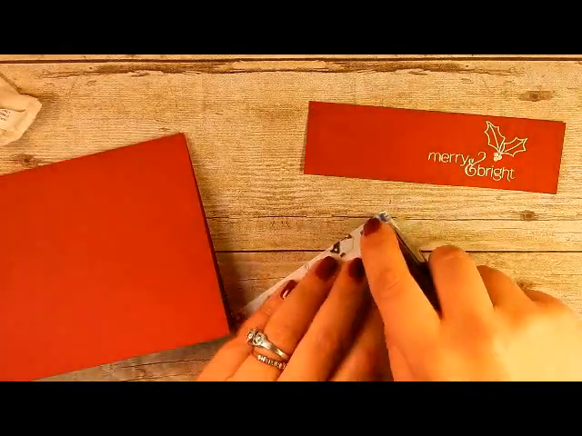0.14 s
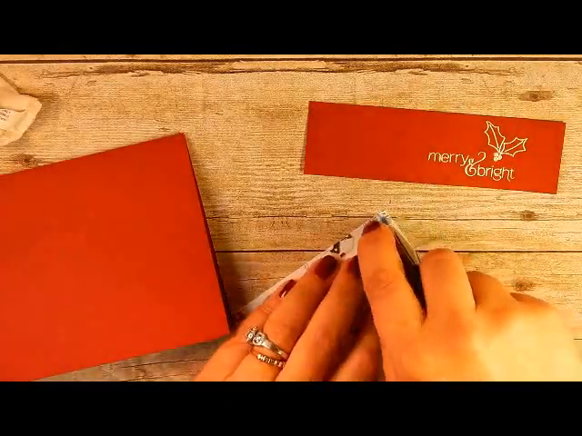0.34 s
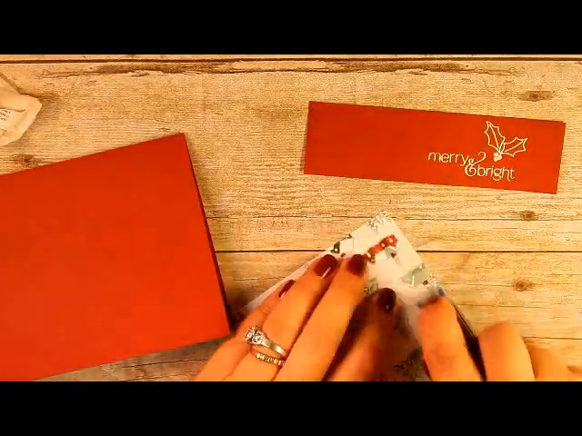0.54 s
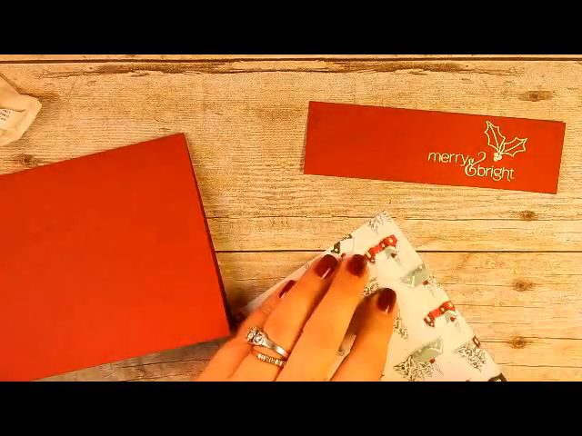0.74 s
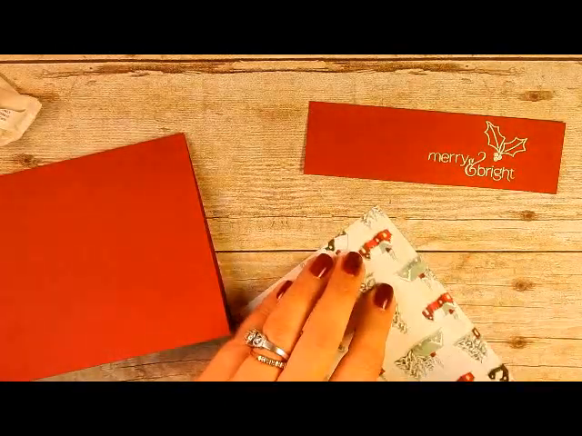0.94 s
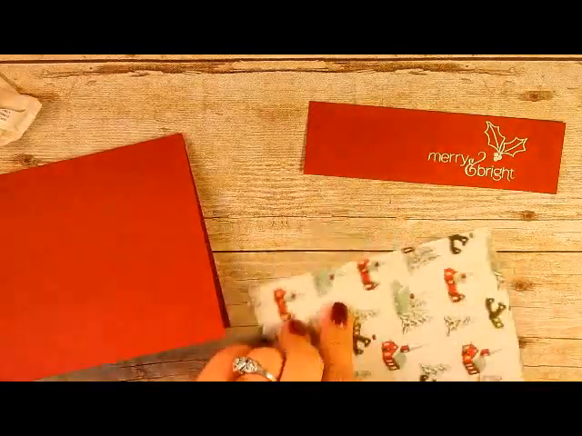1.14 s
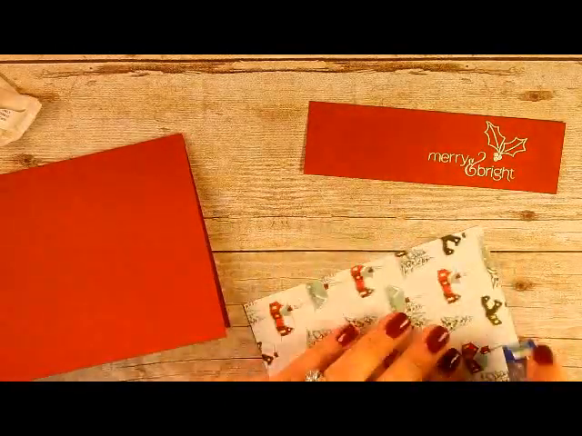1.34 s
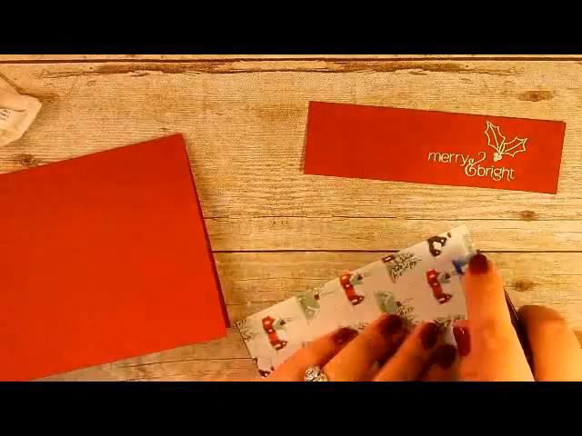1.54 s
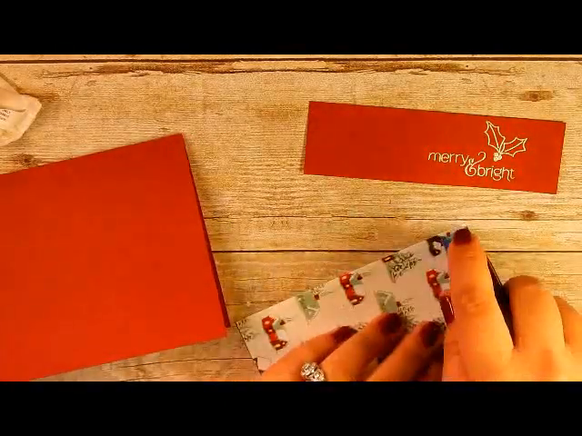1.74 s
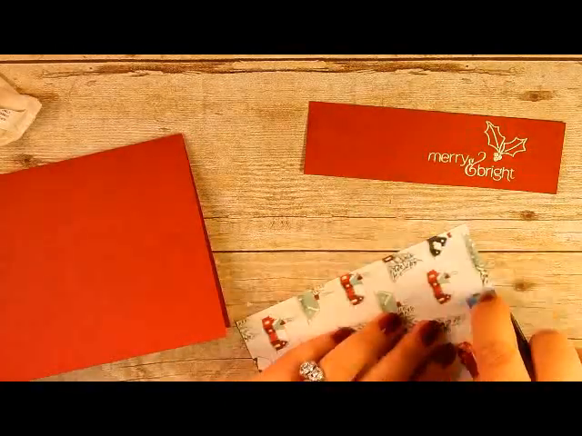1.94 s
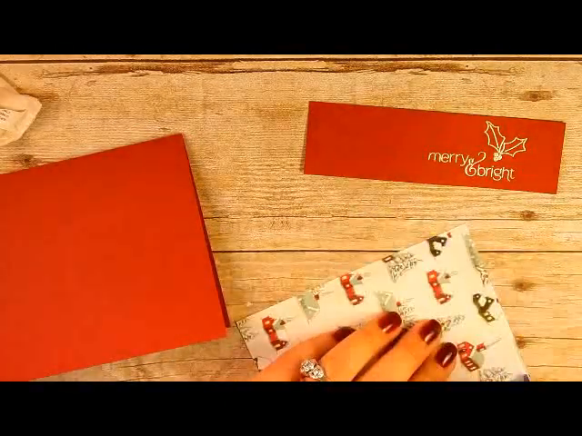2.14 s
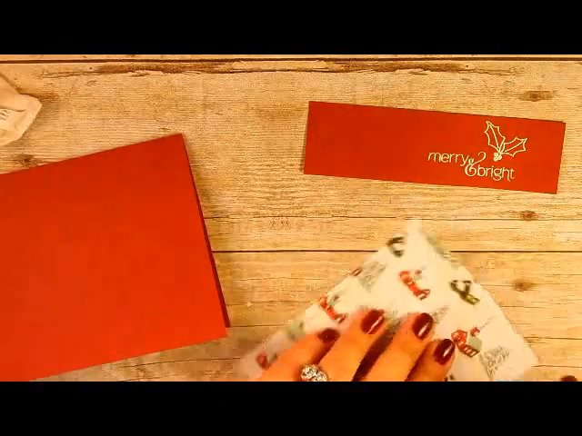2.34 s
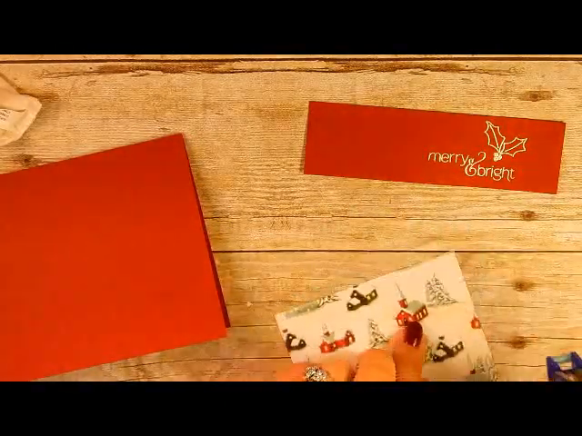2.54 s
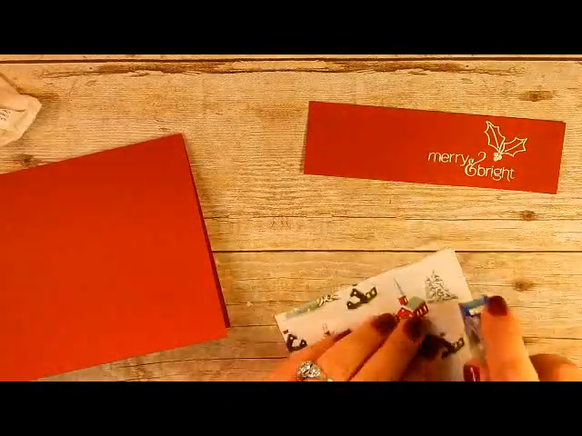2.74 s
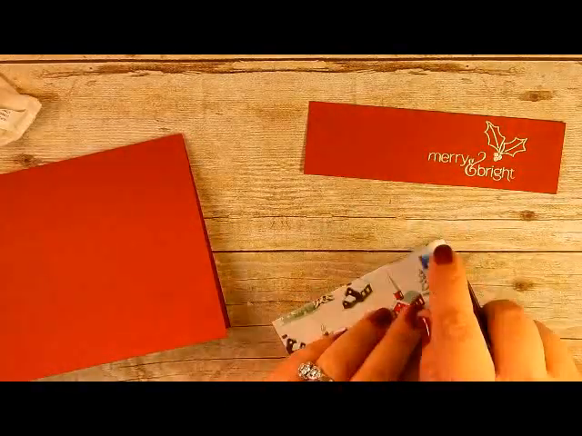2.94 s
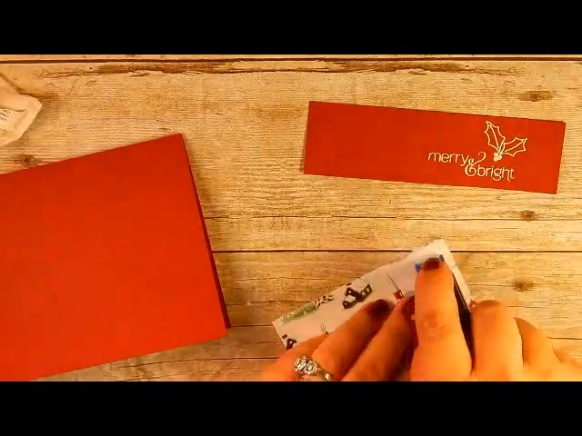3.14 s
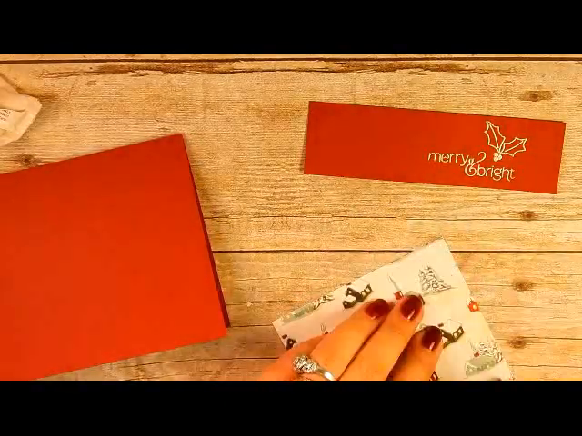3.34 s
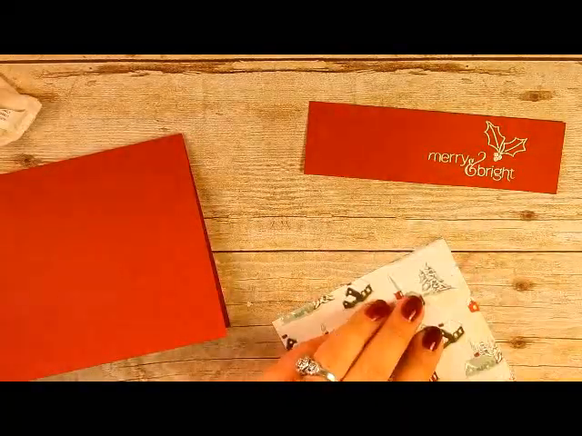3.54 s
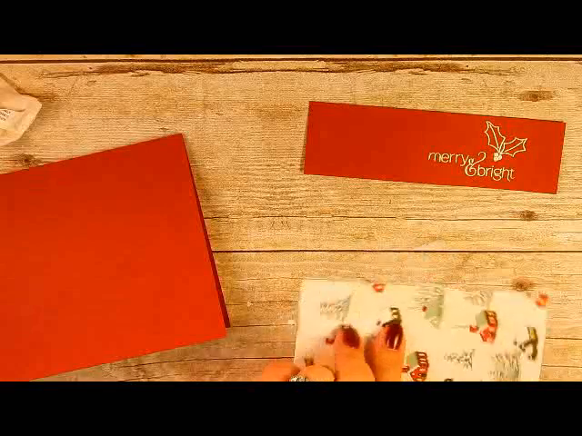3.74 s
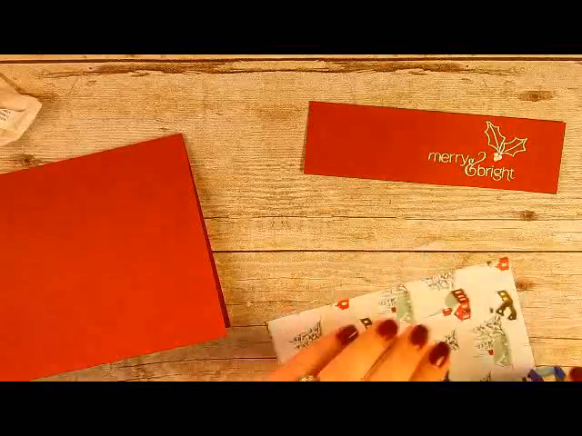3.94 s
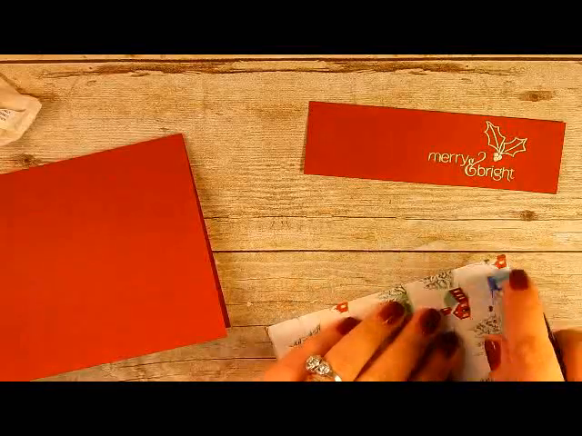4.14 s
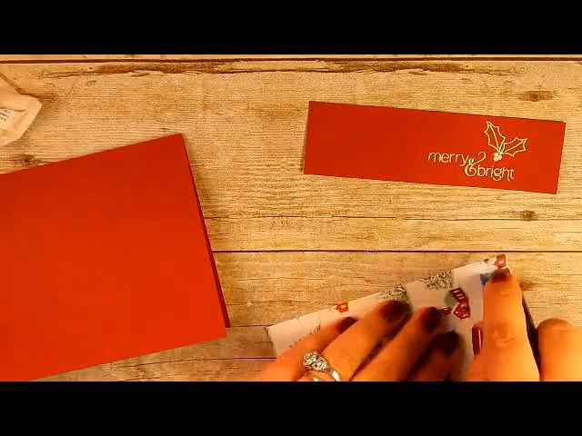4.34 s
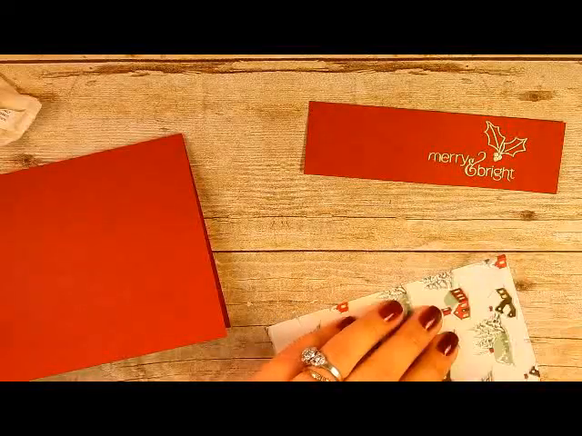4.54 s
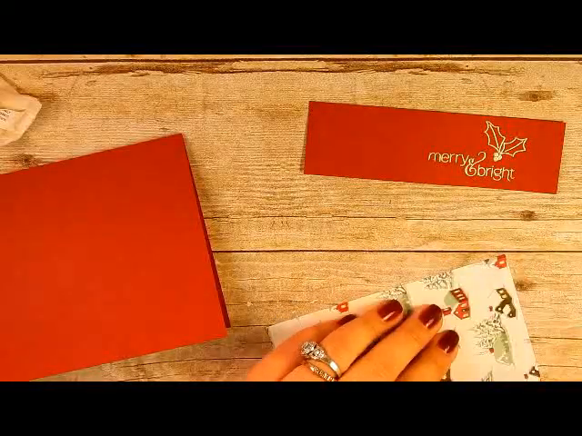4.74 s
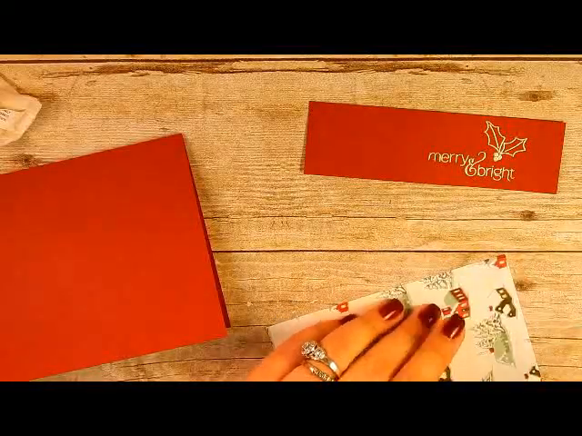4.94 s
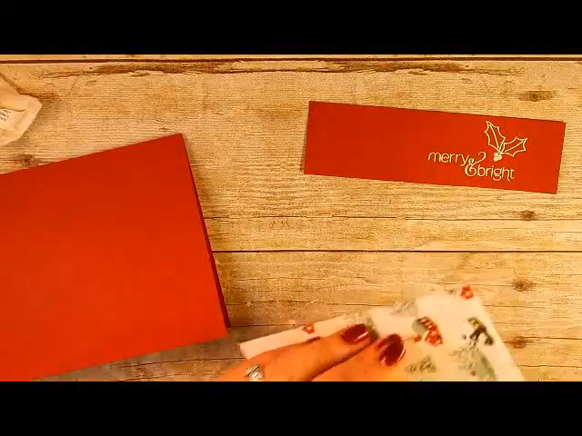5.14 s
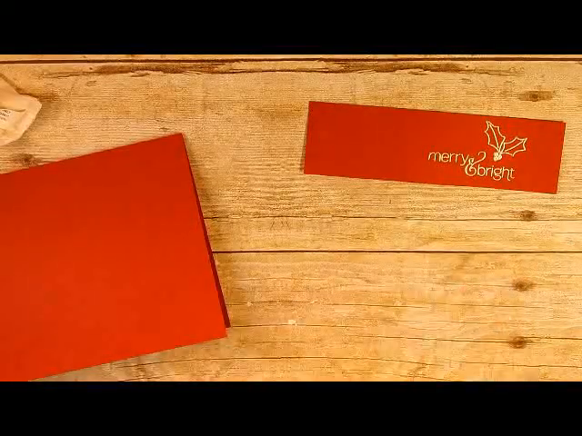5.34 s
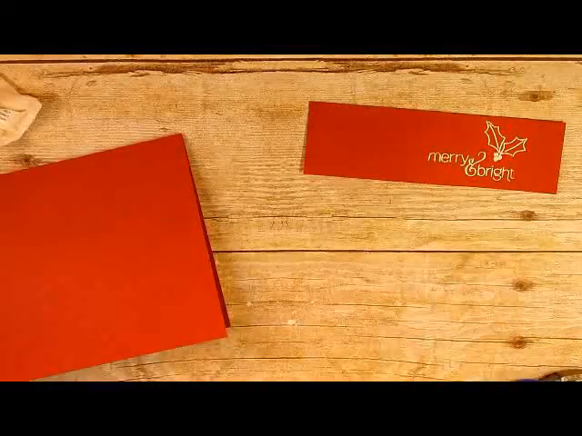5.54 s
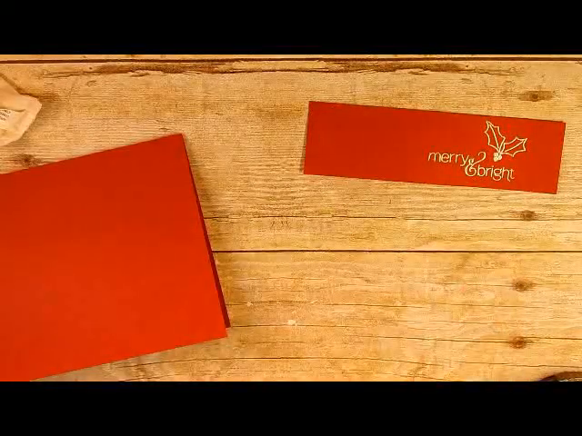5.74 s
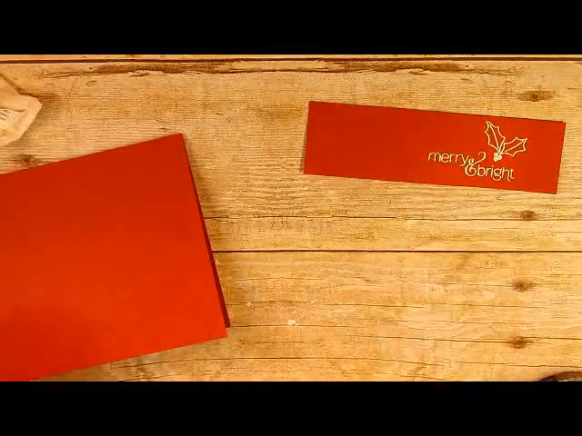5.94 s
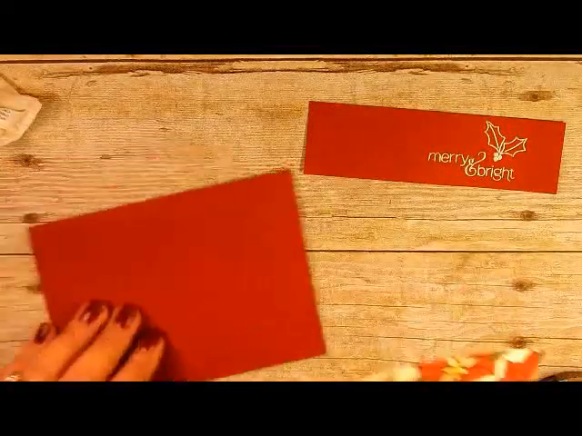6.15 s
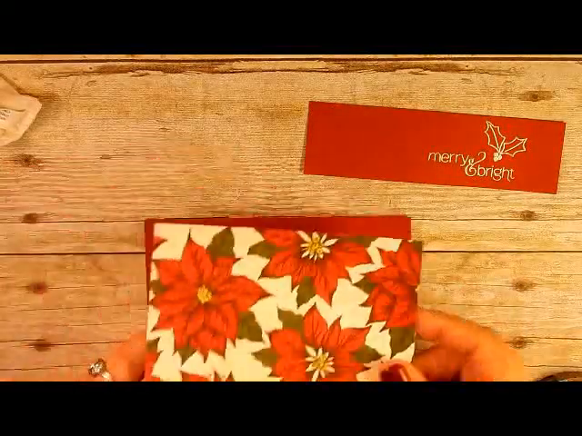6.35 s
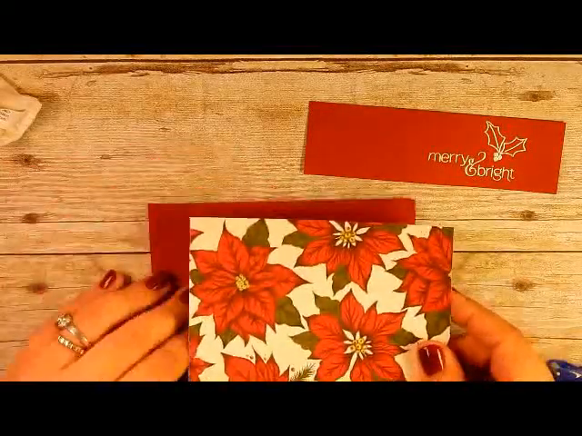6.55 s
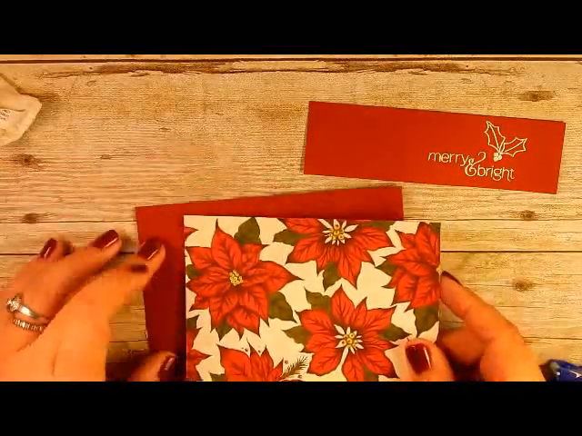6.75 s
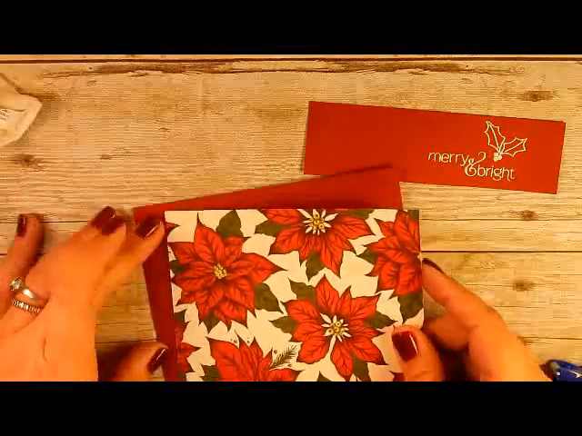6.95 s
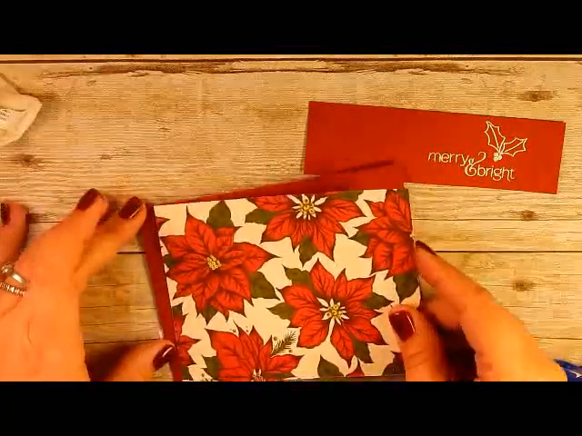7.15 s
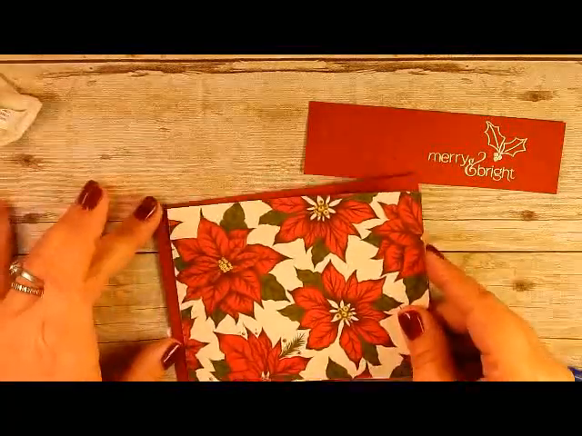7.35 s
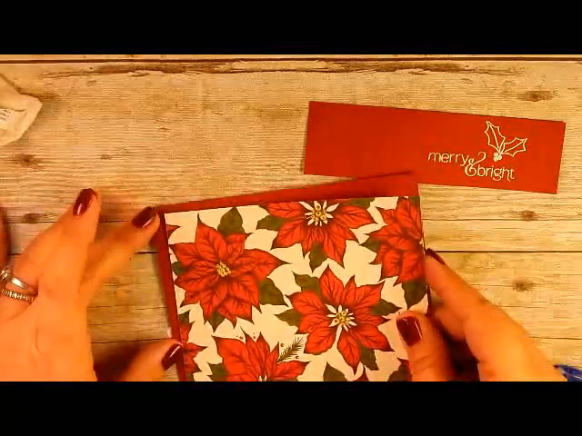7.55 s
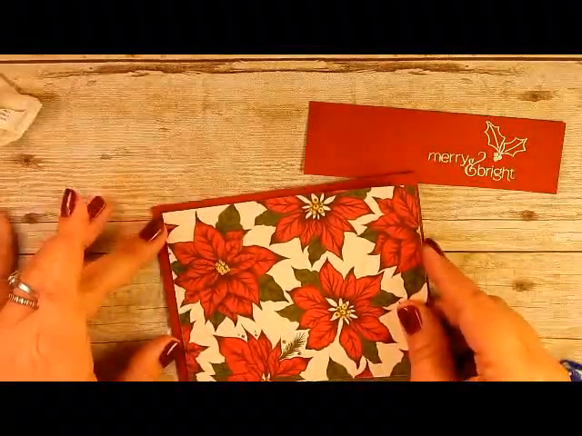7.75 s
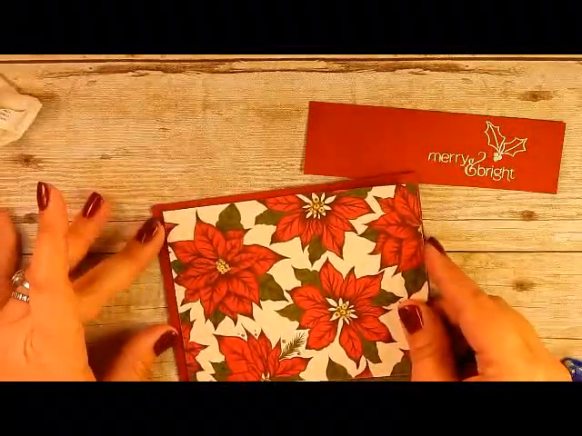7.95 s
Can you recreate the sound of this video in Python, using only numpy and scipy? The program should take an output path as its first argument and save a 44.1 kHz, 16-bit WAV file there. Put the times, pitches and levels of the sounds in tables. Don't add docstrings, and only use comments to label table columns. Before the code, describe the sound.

Close-up desk crafting heard by a near stereo phone microphone. Four rapid stick-slip rasps from a small plastic adhesive roller, each under half a second, bright and gritty with a shifting squeaky ring. Between them paper is turned with faint hiss, scrapes and clicks. Afterwards come hard plastic clacks, the loudest moment, a card thump and smooth swish, then quiet paper scuffs and small ticks over low room rumble.

```python
import sys
import numpy as np
from scipy import signal
from scipy.fft import rfft, irfft, next_fast_len
from scipy.io import wavfile
from scipy.ndimage import uniform_filter1d, minimum_filter1d, map_coordinates

SR = 44100
rng = np.random.default_rng(int(sys.argv[2]) if len(sys.argv) > 2 else 0)


def amplitude_ratio(level_db):
    exponent = np.asarray(level_db, float) / 20
    return 10 ** exponent


def pcm_store(signal):
    levels = np.round(np.clip(np.atleast_2d(signal), -1, 1) * 32767)
    wavfile.write(sys.argv[1], SR, levels.astype(np.int16).T)


N = 352800


def unit(x):
    return x / np.sqrt(np.mean(x ** 2) + 1e-20)


def along(points, hz):
    f, v = np.transpose(points)
    return np.interp(np.log(hz + 1), np.log(f + 1), v)


def wobble(rate):
    knots = rng.standard_normal(int(N * rate / SR) + 4)
    return map_coordinates(knots, [np.arange(N) * rate / SR])


def filtered(x, response):
    m = next_fast_len(x.shape[-1] + 8192)
    return irfft(rfft(x, m) * response(np.fft.rfftfreq(m, 1 / SR)), m)[..., :x.shape[-1]]


def modes(table):
    def response(f):
        total = 0
        for k, (centre, width, db) in enumerate(table):
            damping = 1j * f * width
            total = total + (-1) ** k * amplitude_ratio(db) * damping / (centre * centre - f * f + damping)
        return total
    return response


def even(response):
    gain = np.sqrt(np.mean(np.abs(response(np.arange(1, SR // 2, 5.))) ** 2))
    return lambda hz: response(hz) / gain


def patchy(x, patchy_db):
    z = signal.stft(x, nperseg=128)[2]
    field = uniform_filter1d(rng.standard_normal(z.shape), size=2, axis=0)
    field = uniform_filter1d(field, size=24, axis=1)
    return signal.istft(z * amplitude_ratio(patchy_db * unit(field)), nperseg=128)[1][:N]


# frequency in Hz, level in dB per Hz.
AIR_SPECTRUM = [(15, -28), (32, -8.5), (58, 5.5), (80, -2), (115, -1.5), (200, -4), (450, -11.5),
                (900, -12.5), (1400, -14.5), (2400, -18.5), (4000, -23.5), (5600, -27.5), (6300, -35),
                (10400, -41.5), (12000, -70)]
# frequency in Hz, left-right likeness from 0 to 1.
AIR_LIKENESS = [(60, 0.12), (220, 0.045), (800, 0.58), (2900, 0.79), (10600, 0.26)]


def air():
    turn = lambda hz: np.arccos(np.clip(along(AIR_LIKENESS, hz), -1, 1)) / 2
    pair = np.array([patchy(row, patchy_db=2.5) for row in rng.standard_normal((2, N))])
    mid, side = filtered(pair, lambda hz: amplitude_ratio(along(AIR_SPECTRUM, hz)) * [np.cos(turn(hz)), np.sin(turn(hz))])
    return amplitude_ratio(-55) * unit(np.array([mid + side, mid - side]))


# frequency in Hz, level in dB per Hz.
CRACK_SPECTRUM = [(200, -30), (500, -16.5), (950, -3), (1500, -3), (2200, -4.5), (3200, -5), (4700, -8.5),
                  (7000, -19.5), (10500, -36), (13000, -54)]
# time in seconds, peak in dB, ring in Hz, t60 in seconds.
PATS = [(.2282, -41.5, 1610, 0.041), (1.1286, -39, 1380, 0.062), (1.9075, -30.5, 1510, 0.02),
        (1.919, -41.5, 1500, .09), (1.114, -36.5, 1430, .03), (7.768, -52, 1500, 0.068),
        (5.672, -18, 1590, 0.045), (5.565, -16.5, 2200, 0.041), (5.556, -12, 1770, 0.017),
        (2.0171, -41, 1560, .062), (2.4683, -29.5, 3850, 0.026), (3.7764, -41.5, 1570, 0.022),
        (3.848, -31.5, 3080, 0.015), (4.4091, -31.5, 2514, 0.056), (4.424, -36, 1650, 0.094),
        (4.8698, -38.5, 1540, 0.19), (5.2, -28, 1680, 0.055), (5.3128, -35, 1800, 0.074),
        (5.3962, -38.5, 2900, 0.031), (5.5099, -19, 1400, 0.11), (5.7119, -21.5, 4000, 0.05),
        (5.7915, -30, 2500, 0.015), (5.9114, -39.5, 880, 0.028), (5.9259, -36.5, 1160, 0.029),
        (6.0624, -12.5, 880, 0.014), (6.058, -18, 2070, 0.015), (6.078, -17, 1150, 0.048),
        (6.0859, -16, 1840, 0.069), (6.087, -42, 3550, 0.029), (6.094, -26.5, 1850, 0.059),
        (6.4295, -27, 620, 0.025), (6.4305, -25, 950, .02), (6.053, -18, 760, .05), (6.165, -34, 700, .1),
        (.236, -42, 1650, .06), (5.73, -30, 1400, .05), (6.54, -39, 1300, 0.045),
        (.2175, -44.5, 1150, 0.062), (6.8839, -37.5, 2000, 0.026), (6.9624, -34.5, 1740, 0.063),
        (7.1028, -41, 2070, 0.087), (7.9904, -44, 1830, 0.047), (7.9954, -30, 1780, 0.068)]
# time in seconds, peak in dB, ring in Hz, t60 in seconds.
CLICKS = [(.3415, -36, 1610, 0.018), (.5491, -39.5, 1190, 0.071), (1.8745, -35, 1530, 0.18),
          (1.8845, -32.5, 2830, 0.081), (2.0262, -33.5, 1490, 0.26), (2.4996, -27.5, 6400, 0.024),
          (2.9524, -44, 1370, 0.22), (3.2103, -26, 1960, 0.094), (3.2294, -30.5, 1440, 0.063),
          (3.3223, -33, 1520, 0.18), (3.7229, -26, 2300, 0.032), (3.7456, -33, 1300, 0.097),
          (3.9128, -35.5, 5740, 0.036), (4.4958, -35.5, 1600, 0.038), (4.8854, -32, 1410, 0.11),
          (5.033, -41.5, 1940, 0.069), (5.0715, -31, 2720, 0.054), (5.079, -31, 2060, 0.028),
          (5.1447, -36, 2920, 0.093), (5.1902, -25.5, 2130, 0.033)]
# time in seconds, peak in dB, ring in Hz, t60 in seconds.
TICKS = [(1.0965, -30.5, 3850, 0.062), (1.5684, -33, 1930, 0.043), (2.4394, -28.5, 2780, 0.078),
         (2.4893, -20.5, 6330, 0.0095), (4.2161, -40, 2360, 0.047), (.407, -66, 3250, .015),
         (.492, -68, 3200, 0.013), (.593, -45, 3900, .015), (4.8981, -23, 1390, 0.022),
         (4.9298, -34, 3190, 0.059), (4.9358, -34, 5800, 0.035), (4.9742, -24, 6360, 0.004),
         (4.976, -41, 3500, 0.026), (4.889, -32.5, 5500, .008), (5.4922, -28.5, 1630, 0.096),
         (6.4303, -16.5, 2840, 0.014), (7.781, -38, 5530, .03), (7.7846, -19.5, 5870, 0.0021),
         (7.7862, -21.5, 5350, 0.0032), (7.7876, -22, 4520, 0.0048), (7.792, -58, 5530, 0.078),
         (7.747, -56, 7000, .03)]
# time in seconds, peak in dB, ring in Hz, t60 in seconds.
KNOCKS = [(5.5024, -15.5, 3400, 0.045), (5.507, -12.5, 3280, 0.028), (5.5518, -5, 1810, .012),
          (5.5545, -4.5, 3270, 0.0092), (5.5863, -13, 3150, 0.11), (5.5926, -14, 1440, 0.072),
          (5.6625, -14.5, 3780, 0.023), (5.6655, -5, 1820, 0.022), (5.78, -34, 2650, 0.022),
          (5.901, -36.5, 1900, 0.033), (6.0154, -39.5, 1900, 0.13), (6.0421, -25.5, 1020, 0.11),
          (6.0526, -10, 2850, 0.018), (6.0535, -13.5, 4660, 0.012), (6.2322, -21.5, 2580, 0.023),
          (6.238, -24, 1480, 0.059), (6.5725, -20, 1410, 0.05), (6.5835, -20.5, 3120, 0.028),
          (6.598, -25.5, 1410, 0.13), (6.5905, -17, 1440, 0.034), (6.632, -29, 4300, 0.11),
          (6.036, -32, 4200, 0.15), (6.6247, -19, 1580, 0.064), (6.645, -25.5, 1370, 0.12),
          (6.9239, -35, 1810, 0.041), (7.3325, -32, 2890, 0.0097), (7.5001, -40.5, 1700, 0.11),
          (7.9557, -45, 1560, 0.079)]


def taps():
    out, t = np.zeros(N + SR), np.arange(SR // 6) / SR
    chatter = amplitude_ratio(2.7 * wobble(520))
    kinds = [(TICKS, 28), (CLICKS, 4), (KNOCKS, -1), (PATS, -32.5)]
    for rows, treble_db in kinds:
        for s, db, ring_hz, t60 in rows:
            t60, start = np.clip(t60, .003, .3), round(s * SR)
            onset = (1 - np.exp(-t / (.016 * t60))) ** 2
            rattle = (1.1 * amplitude_ratio(-60 * t / min(.012, t60)) + amplitude_ratio(-60 * t / t60)) * onset
            burst = rattle * np.resize(chatter[start:], len(t)) * rng.standard_normal(len(t))
            tilt = lambda hz: amplitude_ratio(treble_db * np.clip(np.log2((hz + 1) / 2500) / 2, 0, 1.2))
            ring = modes([(ring_hz, .16 * ring_hz, 5)])
            sound = filtered(burst, lambda hz: amplitude_ratio(along(CRACK_SPECTRUM, hz)) * tilt(hz) + ring(hz))
            out[start:][:len(t)] += amplitude_ratio(db) * sound / np.abs(sound).max()
    return out[:N]


# frequency in Hz, width in Hz, level in dB.
DESK_MODES = [(60.7, 16, -5), (110.8, 20.3, 2), (203.4, 66, -0.5), (359, 160, -5), (687, 90, 0)]
# time in seconds, push in dB.
THUDS = [(.2282, -56), (1.5702, -34.5), (1.599, -37.5), (1.8735, -40.5), (1.884, -49.5), (2.0283, -50.5),
         (2.442, -49), (2.9533, -45), (3.21, -29), (3.2282, -40), (3.3234, -56), (3.747, -53),
         (4.215, -45.5), (4.4085, -40), (5.493, -42), (5.5024, -34), (5.5095, -30), (5.552, -26.5),
         (5.5866, -31.5), (5.592, -56), (5.665, -44), (5.71, -43.5), (6.0142, -51), (6.044, -43.5),
         (6.0624, -58), (6.23, -42), (6.5747, -36.5), (6.6495, -48), (7.1008, -45.5), (7.9954, -27.5)]


def thuds():
    pushes, t = np.zeros(N + SR), np.arange(SR // 50) / SR
    for s, db in THUDS:
        pushes[round(s * SR):][:len(t)] += amplitude_ratio(db + 27) * t / 0.0021 * np.exp(-t / 0.00084)
    return filtered(pushes[:N], modes(DESK_MODES))


# time in seconds, ring in Hz, level in dB.
SPAN_RING = [
    [(.62, 5430, 4), (.7, 5300, 1), (.76, 5040, 9), (.8, 3260, 8), (.85, 3070, 7.5), (.91, 3600, 8),
     (.97, 3600, 14.5)],
    [(2.06, 4350, 9.5), (2.12, 4900, 7.5), (2.17, 5300, 4.5), (2.2, 2640, 0), (2.24, 4800, 9),
     (2.29, 4500, 6), (2.33, 4140, 5)],
    [(3.35, 5500, 10), (3.42, 5200, 2), (3.46, 4000, 2.5), (3.55, 3880, 7), (3.62, 3520, 1.5),
     (3.68, 3560, 2.5)],
    [(4.55, 3100, 4), (4.6, 5400, 9.5), (4.65, 4950, 7), (4.69, 3000, 6.5), (4.74, 3950, 4.5),
     (4.8, 3570, 5)],
]


def span_ring(x):
    hz, t, z = signal.stft(x, SR, nperseg=256)
    s, ring_hz, db = np.transpose(np.concatenate(SPAN_RING))
    widths_away = np.log2((hz[:, None] + 1) / np.interp(t, s, ring_hz)) / .12
    gain_db = np.interp(t, s, db) * np.exp(-widths_away ** 2 / 2)
    return signal.istft(z * amplitude_ratio(gain_db), SR, nperseg=256)[1][:N]


# time in seconds, level in dB.
STROKES = [
    [(.64, -45.5), (.69, -31.5), (.76, -24.5), (.83, -24.5), (.9, -28.5), (.955, -35.5)],
    [(2.075, -35), (2.12, -26), (2.16, -24.5), (2.19, -29), (2.245, -27.5), (2.31, -30.5), (2.335, -41)],
    [(3.36, -36.5), (3.41, -29), (3.48, -26), (3.62, -27.5), (3.67, -36.5)],
    [(4.57, -43.5), (4.61, -29), (4.65, -23.5), (4.72, -28), (4.78, -32), (4.82, -45.5)],
]


def pull():
    s, db = np.transpose(np.concatenate(STROKES))
    t = np.arange(N) / SR
    gate = np.zeros(N)
    for rows in STROKES:
        gate += np.clip(np.minimum(t - rows[0][0], rows[-1][0] - t) / .0084 + .5, 0, 1)
    return np.minimum(gate, 1), np.interp(t, s, db)


# frequency in Hz, width in Hz, level in dB.
HOUSING_MODES = [(1150, 650, -10.5), (1560, 240, 1), (2280, 380, -6), (2890, 337, -1), (4130, 700, -2.5),
                 (4750, 340, 0.5), (5440, 1000, -1), (6730, 900, -1), (7770, 810, -4), (10600, 1100, -13)]
# time in seconds, peak in dB.
SLIPS = [(0.6075, -26), (0.6107, -14), (0.6295, -8), (0.642, -9), (0.65, -14.5), (0.6612, -11),
         (0.669, -14), (0.681, -11.5), (0.7, -5), (0.8607, -11), (0.8973, -18), (0.9027, -10),
         (0.9203, -23), (0.9642, -9.5), (2.0568, -14), (2.069, -13.5), (2.079, -20), (2.2524, -32),
         (3.352, -15), (3.3655, -19.5), (3.3757, -14.5), (3.4475, -18.5), (3.6553, -13), (3.677, -10),
         (4.5335, -22), (4.5375, -9), (4.556, -8.5), (4.575, -8), (4.5866, -13.5), (4.596, -16),
         (4.7937, -18)]
# time in seconds, peak in dB.
CATCHES = [(0.7307, -8), (0.7512, -7), (0.7698, -6), (0.8002, -5), (0.811, -8), (0.8285, -7.5),
           (0.934, -15.5), (2.0931, -14.5), (2.099, -9), (2.1118, -9), (2.1204, -5.5), (2.1383, -9.5),
           (2.1447, -7), (2.1515, -5), (2.1632, -6), (2.1746, -12), (2.182, -15.5), (2.1874, -10),
           (2.1979, -5), (2.2169, -12), (2.2284, -9.5), (2.2341, -6), (2.2658, -13), (2.2739, -12.5),
           (2.2984, -18), (2.3137, -14), (3.3864, -11.5), (3.3964, -13.5), (3.4057, -8), (3.4155, -12),
           (3.423, -10), (3.4287, -11.5), (3.435, -7.5), (3.442, -10), (3.4583, -12), (3.4755, -11),
           (3.493, -12.5), (3.5137, -13), (3.5199, -7.5), (3.5308, -13.5), (3.5542, -12.5), (3.578, -9.5),
           (3.5917, -10), (3.617, -6.5), (3.6317, -15.5), (3.6432, -12.5), (4.6016, -9.5), (4.6102, -11.5),
           (4.6318, -9), (4.6386, -10), (4.6496, -12.5), (4.6544, -12), (4.6948, -6.5), (4.7056, -13.5),
           (4.729, -13.5), (4.7348, -17), (4.741, -14.5), (4.7542, -18), (4.7703, -12), (4.7796, -15.5)]
BODY_DB = [-4.5, -3.5, -3, -2.5]
BODY_GROWS = [.35, .06, .06, .03]


def runner():
    gate, level_db = pull()
    over_db = level_db + 26
    treble_db = -4 + .45 * over_db
    stroke = np.searchsorted([rows[-1][0] + .2 for rows in STROKES[:-1]], np.arange(N) / SR)
    body_db = np.array(BODY_DB)[stroke] + np.array(BODY_GROWS)[stroke] * over_db

    rate = 240 * amplitude_ratio(0.74 * np.clip(level_db + 25.5, -20, 3))
    turns = np.cumsum(rate * amplitude_ratio(1.4 * wobble(45))) / SR
    quick = np.diff(np.floor(turns), prepend=0) * amplitude_ratio(2.1 * rng.standard_normal(N))
    slow, hard = np.zeros(N), np.zeros(N)
    slow[[round(s * SR) for s, db in SLIPS]] = amplitude_ratio(np.array(SLIPS)[:, 1] + 1)
    hard[[round(s * SR) for s, db in CATCHES]] = amplitude_ratio(np.array(CATCHES)[:, 1] - 19)

    t = np.arange(SR // 25) / SR
    slip = (amplitude_ratio(-60 * t / 0.015) + 0.067 * amplitude_ratio(-60 * t / 0.063)) * (1 - np.exp(-t / 0.0038)) ** 2
    catch = np.exp(-((t - .003) / .0015) ** 2)
    stream = signal.fftconvolve(quick, amplitude_ratio(-60 * t / .012))[:N]
    stream = stream / np.abs(uniform_filter1d(stream, size=1100) + .01) * .55 + .45
    force = gate * amplitude_ratio(level_db - 4.5) * stream
    force = force + signal.fftconvolve(slow, slip)[:N] + signal.fftconvolve(hard, catch)[:N]

    teeth = gate * amplitude_ratio(level_db + 7) * quick + amplitude_ratio(13) * np.roll(hard, round(.003 * SR))
    click = lambda hz: 1j * hz / (2200 + 1j * hz) / (1 + 1j * hz / 7000) ** 2
    drive = patchy(force * rng.standard_normal(N), patchy_db=2) + filtered(teeth, click)

    shell = lambda hz: modes(HOUSING_MODES)(hz) * (1j * hz / (800 + 1j * hz)) ** 3
    high = lambda hz: 1 / (1 + (5000 / (hz + 1)) ** 8)
    low = lambda hz: 1 / (1 + (hz / 2450) ** 12)
    middle = filtered(drive, even(lambda hz: shell(hz) * (1 - high(hz) - low(hz))))
    bright = amplitude_ratio(treble_db) * filtered(drive, even(lambda hz: shell(hz) * high(hz)))
    body = amplitude_ratio(body_db) * filtered(drive, even(lambda hz: shell(hz) * low(hz)))
    desk = filtered(drive, even(lambda hz: modes(DESK_MODES)(hz) / (1 + (hz / 900) ** 2)))
    return span_ring(amplitude_ratio(-1) * (middle + bright)) + body + amplitude_ratio(-24.5) * desk


def noise(spectrum, grain_db, patchy_db):
    rough = amplitude_ratio(grain_db * wobble(260)) * rng.standard_normal(N)
    return unit(filtered(patchy(rough, patchy_db), lambda hz: amplitude_ratio(along(spectrum, hz))))


def swell(start, rise, fall, edge_db, fade=0.031):
    gain, end = np.zeros(N), start + rise + fall
    near = slice(max(round((start - fade) * SR), 0), round((end + fade) * SR))
    t = np.arange(N)[near] / SR
    gate = np.clip(np.minimum(t - start, end - t) / fade + .5, 0, 1)
    gain[near] = gate * amplitude_ratio(np.interp(t, [start, start + rise, end], [-edge_db, 0, -edge_db]))
    return gain


# frequency in Hz, level in dB per Hz.
FIZZ_SPECTRUM = [(4500, -41), (6500, -7), (8000, 1), (10500, -3.5), (13000, -47)]
# frequency in Hz, level in dB per Hz.
HISS_SPECTRUM = [(1500, -19.5), (2600, -7), (4000, -6), (6000, -7), (8000, -13), (11000, -50)]
# frequency in Hz, level in dB per Hz.
SCRAPE_SPECTRUM = [(600, -42.5), (1050, -17.5), (1400, -6.5), (1600, 0), (2150, -1.5), (2600, -14.5),
                   (4000, -40.5)]
# frequency in Hz, level in dB per Hz.
BOARD_SPECTRUM = [(90, -40), (170, -6), (300, 0), (550, -4), (900, -16), (1400, -45)]
# start in seconds, speeding up in seconds,
# slowing down in seconds, hiss in dB, fizz over hiss in dB.
SLIDES = [(1.1, 0.02, 0.067, -59, 3), (1.188, 0.036, 0.099, -54, 3.5), (1.283, 0.043, 0.059, -50, 7.5),
          (1.608, 0.022, 0.043, -60, 2), (2.49, 0.088, 0.19, -52, 5.5), (2.922, 0.017, 0.11, -62, -2),
          (3.806, 0.11, 0.12, -51, 5), (5.222, 0.32, 0.095, -52.5, -5), (6.253, .12, 0.093, -36, -6.5),
          (6.452, 0.063, 0.061, -48.5, -5.5), (6.81, 0.021, 0.15, -59.5, -2.5),
          (6.95, 0.18, 0.34, -62.5, -6.5), (7.368, 0.028, 0.02, -57, -6), (7.43, 0.074, 0.17, -63, -8.5),
          (7.79, 0.028, 0.082, -75, 4)]
# start in seconds, rise in seconds, fall in seconds,
# scrape in dB, board over scrape in dB.
SCUFFS = [(1.11, 0.01, 0.024, -51.5, -6), (1.61, 0.048, 0.037, -62.5, 6.5),
          (2.467, 0.016, 0.036, -49, -13.5), (1.895, 0.012, 0.029, -48.5, -17),
          (3.74, 0.032, 0.088, -57.5, -5), (3.928, 0.04, 0.056, -62.5, 0),
          (5.893, 0.023, 0.035, -70.5, 23.5), (6.132, 0.062, 0.032, -67.5, 28),
          (6.28, 0.18, 0.019, -52, -22), (6.518, 0.021, 0.012, -62, 7), (6.811, 0.039, 0.011, -40, -30),
          (6.87, 0.094, 0.083, -58, 1.5), (7.05, 0.21, 0.27, -64, -3)]
# time in seconds, t60 in seconds,
# scrape in dB, hiss over scrape in dB, board over scrape in dB.
SETTLES = [(.98, 0.56, -67, 10, -6), (1.915, 0.17, -58, -16.5, -10), (2.35, 0.76, -59.5, 0, -15.5),
           (3.69, 0.22, -39, -13, -23.5), (4.82, 0.72, -56, -7, -12), (5.22, 0.21, -60, -15, -4),
           (5.51, 1, -39, -9.5, -6.5), (6.059, 0.19, -38, -43, 10.5), (6.245, 0.12, -43, -7, 8),
           (6.44, 0.092, -70, -2, 20), (6.58, 0.99, -53.5, 3.5, -13)]


def paper():
    gain, t = np.zeros((4, N)), np.arange(N) / SR
    for start, rise, fall, db, fizz_db in SLIDES:
        gain[0] += amplitude_ratio(db + fizz_db) * swell(start, rise, fall, edge_db=10.5)
        gain[1] += amplitude_ratio(db) * swell(start, rise, fall, edge_db=5)
    for start, rise, fall, db, board_db in SCUFFS:
        gain[2:] += amplitude_ratio([[db], [db + board_db]]) * swell(start, rise, fall, edge_db=8)
    for s, t60, db, hiss_db, board_db in SETTLES:
        near = slice(max(round(s * SR) - 500, 0), round((s + t60) * SR))
        fall = np.clip((t[near] - s) / .019 + .5, 0, 1) * amplitude_ratio(-60 * np.abs(t[near] - s) / t60)
        layers_db = db + np.array([[hiss_db - 7.5], [hiss_db], [0], [board_db]])
        gain[:, near] += amplitude_ratio(layers_db) * fall
    drag = wobble(45)
    fizz = amplitude_ratio(0.81 * drag) * noise(FIZZ_SPECTRUM, grain_db=1.5, patchy_db=1.5)
    hiss = amplitude_ratio(0.19 * drag) * noise(HISS_SPECTRUM, grain_db=2.5, patchy_db=-2)
    scrape = amplitude_ratio(1.5 + 0.57 * drag) * noise(SCRAPE_SPECTRUM, grain_db=0, patchy_db=6.5)
    board = amplitude_ratio(-2 + 1.3 * wobble(25)) * noise(BOARD_SPECTRUM, grain_db=7.5, patchy_db=-0.5)
    return (gain * [fizz, hiss, scrape, board]).sum(axis=0)


# frequency in Hz, t60 in seconds.
ROOM_T60 = [(200, 0.32), (2000, 0.26), (5000, 0.2), (10000, 0.1)]


def room(x):
    out, step = np.zeros((2, N + SR)), SR // 4
    for start in range(0, N, step):
        hz, t, z = signal.stft(rng.standard_normal((2, SR // 3)), SR, nperseg=256)
        decay = amplitude_ratio(-60 * t / along(ROOM_T60, hz)[:, None])
        tail = signal.istft(z * decay, SR, nperseg=256)[1]
        wet = signal.fftconvolve(x[None, start:start + step], tail / np.linalg.norm(tail[0]), axes=1)
        first = start + 130
        out[:, first:first + wet.shape[1]] += wet
    return out[:, :N]


# frequency in Hz, level in dB relative to the shared sound.
PORT_DIFFERENCE = [(200, -18.5), (1000, -25.5), (2500, -22), (5000, -15.5), (9000, -5.5)]


def scene():
    desk = runner() + paper() + taps() + thuds()
    tail, other = room(desk)
    lagged = filtered(desk, lambda hz: (0.16 + .4j) * amplitude_ratio(along(PORT_DIFFERENCE, hz)))
    side = lagged + filtered(other, lambda hz: amplitude_ratio(along(PORT_DIFFERENCE, hz) - 5))
    return (desk + amplitude_ratio(-9.5) * tail + np.array([side, -side])) * amplitude_ratio([[.3], [-.3]]) + air()


def hushed(x):
    treble = filtered(x, lambda hz: 1 / (1 + (4200 / (hz + 1)) ** 6))
    power = np.abs(uniform_filter1d(treble.mean(axis=0) ** 2, size=90))
    now_db = 10 * np.log10(power + 1e-12)
    ahead = round(.013 * SR)
    soon_db = np.roll(-minimum_filter1d(-now_db, size=ahead), -(ahead // 2))
    depth = uniform_filter1d(np.clip((soon_db - now_db - 17) / 8, 0, 1), size=60)
    return x - treble * (1 - amplitude_ratio(-20 * np.roll(depth, -SR // 300)))


def band_limit(x):
    return signal.sosfilt(signal.butter(12, 11180, fs=SR, output="sos"), x)


def record(dry):
    shelf = lambda hz: amplitude_ratio(-39.5) / (1 + (hz / 10900) ** 30)
    band = lambda hz: 1 / (1 + (hz / 10285) ** 100) + shelf(hz)
    mix = filtered(hushed(dry), band)
    return band_limit(mix)


dry = scene()
out = record(dry)
pcm_store(out)
```